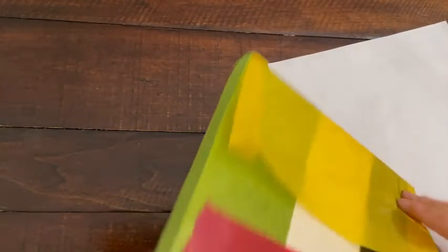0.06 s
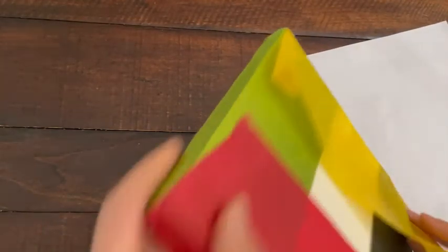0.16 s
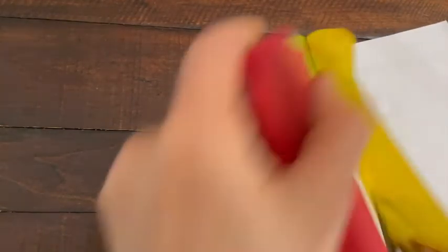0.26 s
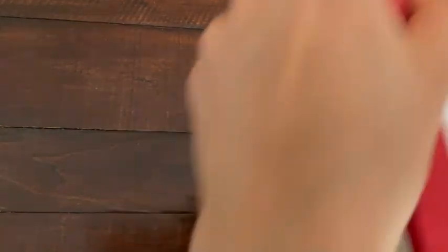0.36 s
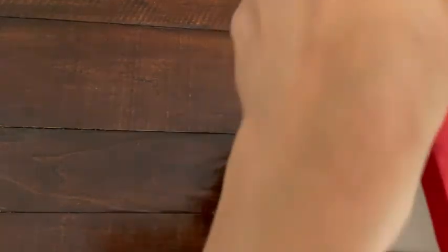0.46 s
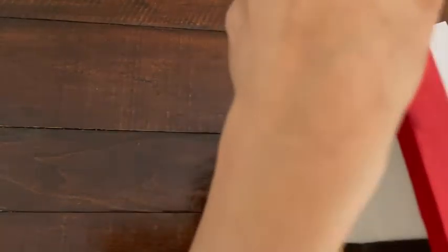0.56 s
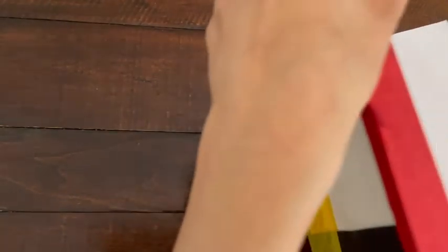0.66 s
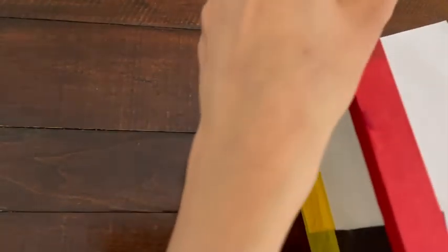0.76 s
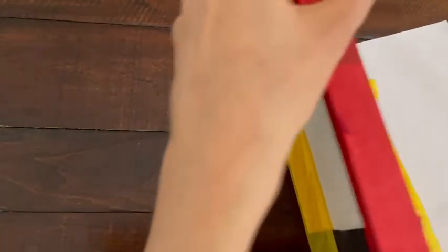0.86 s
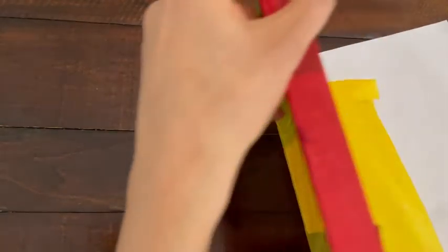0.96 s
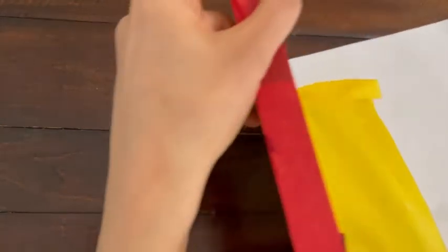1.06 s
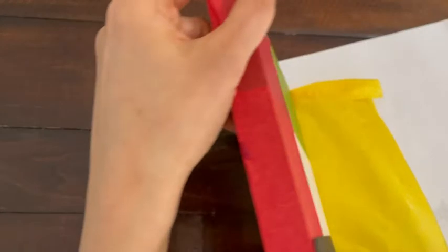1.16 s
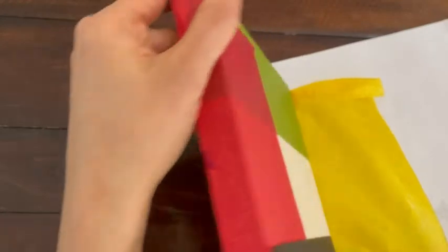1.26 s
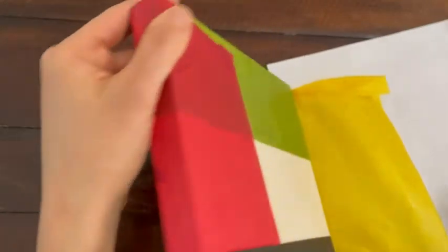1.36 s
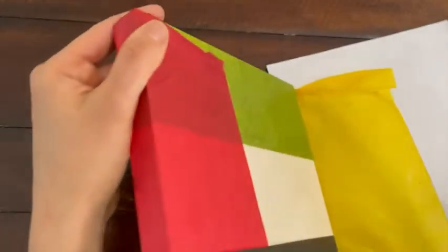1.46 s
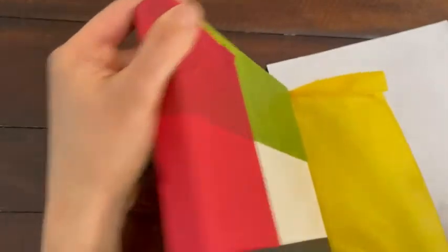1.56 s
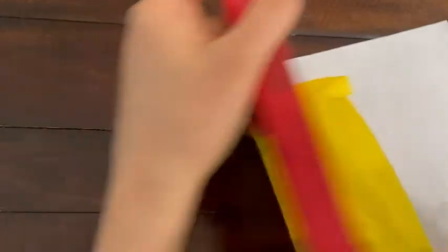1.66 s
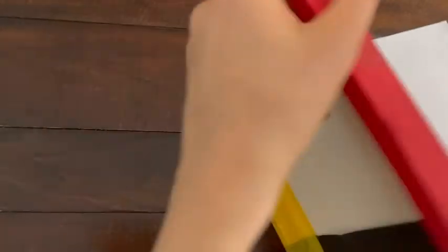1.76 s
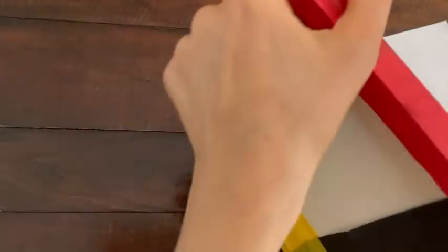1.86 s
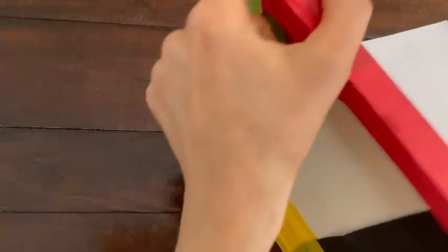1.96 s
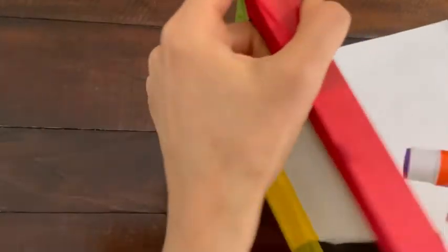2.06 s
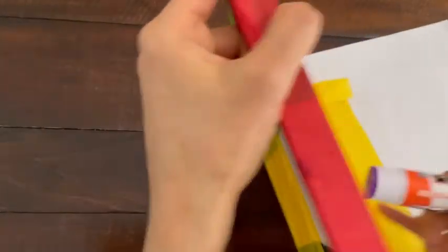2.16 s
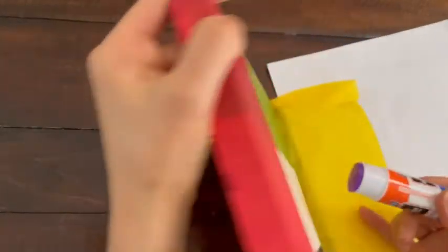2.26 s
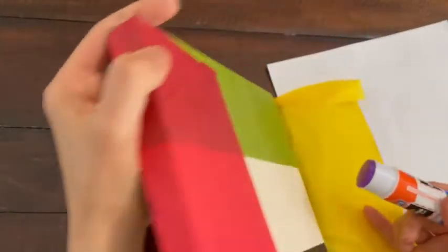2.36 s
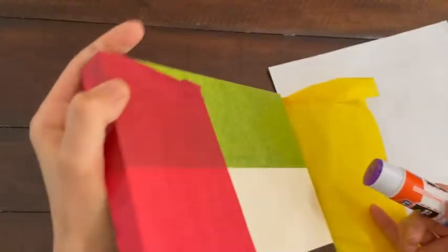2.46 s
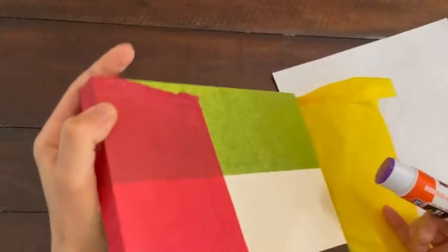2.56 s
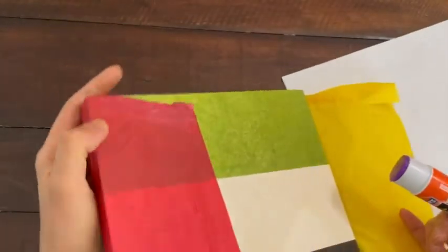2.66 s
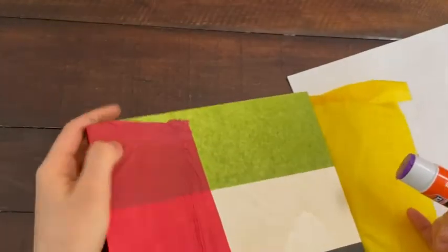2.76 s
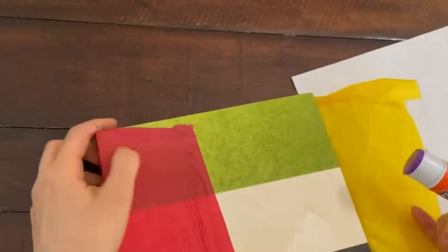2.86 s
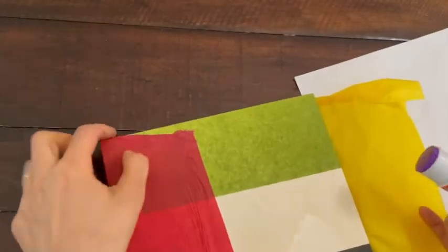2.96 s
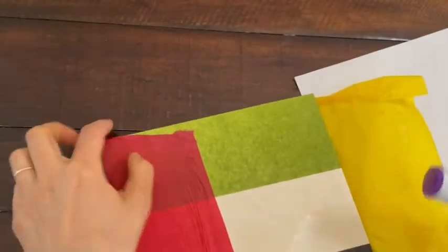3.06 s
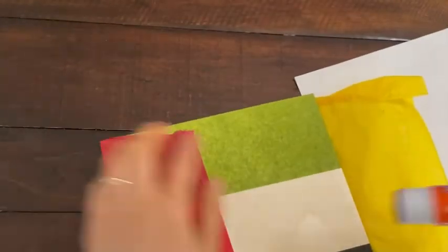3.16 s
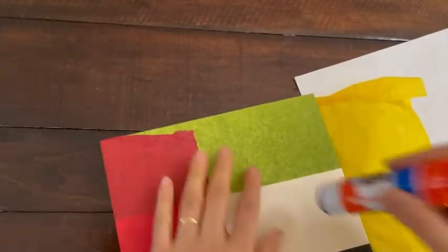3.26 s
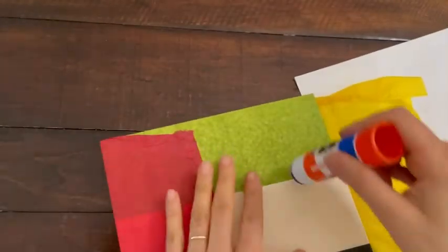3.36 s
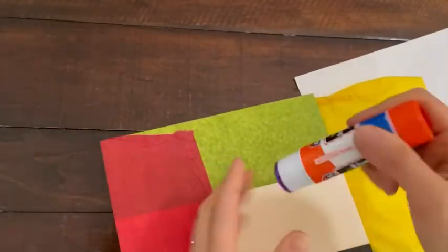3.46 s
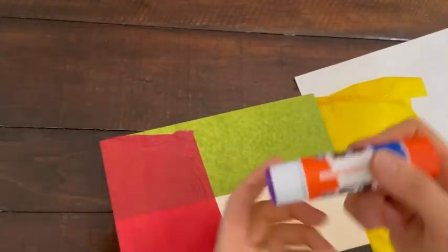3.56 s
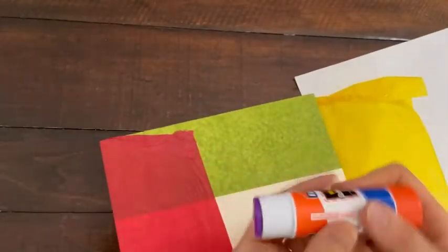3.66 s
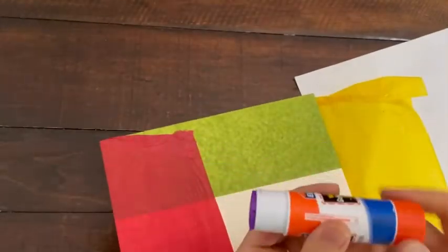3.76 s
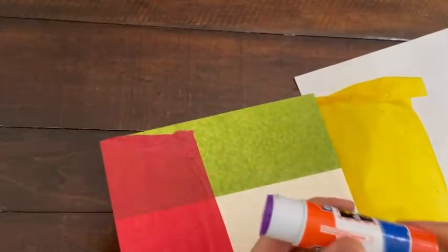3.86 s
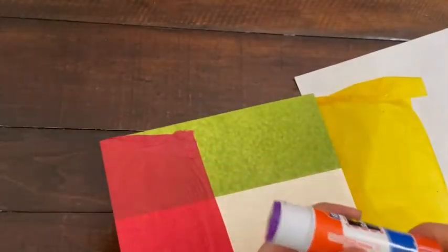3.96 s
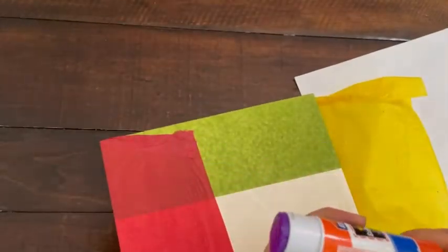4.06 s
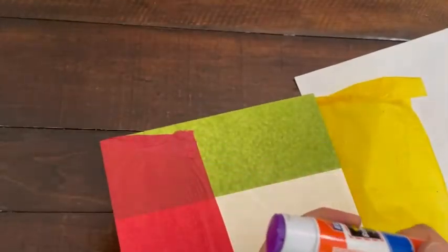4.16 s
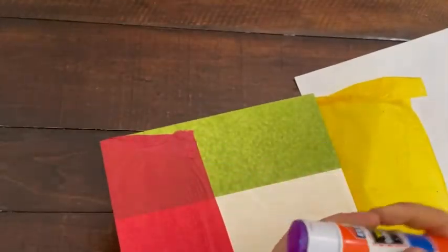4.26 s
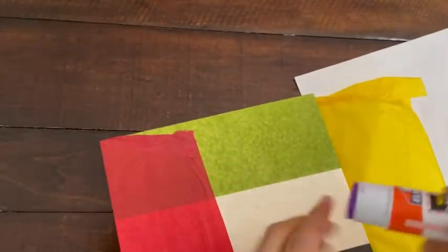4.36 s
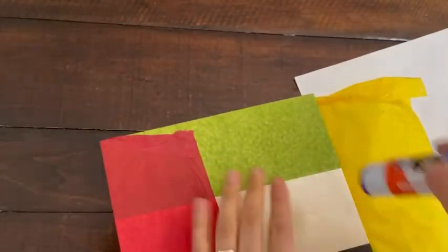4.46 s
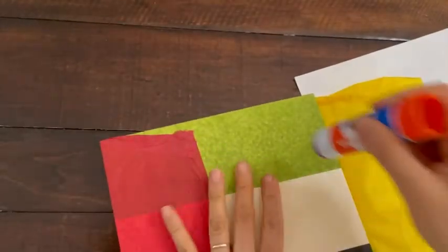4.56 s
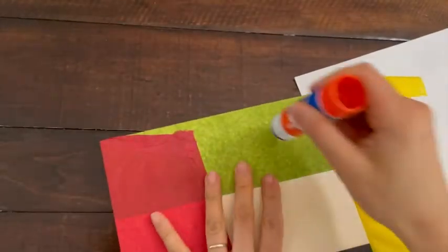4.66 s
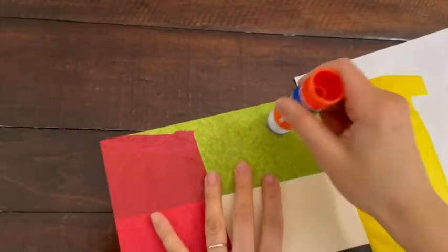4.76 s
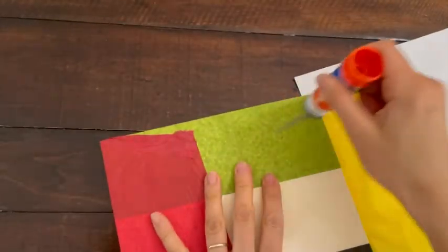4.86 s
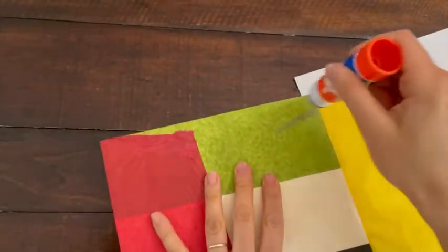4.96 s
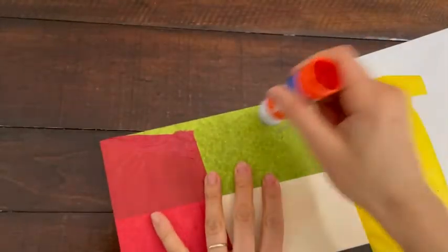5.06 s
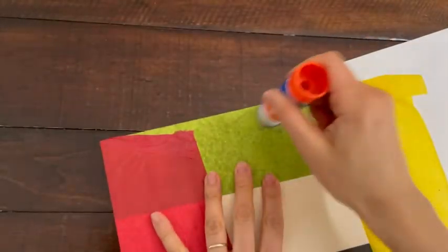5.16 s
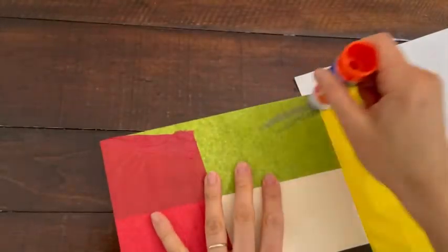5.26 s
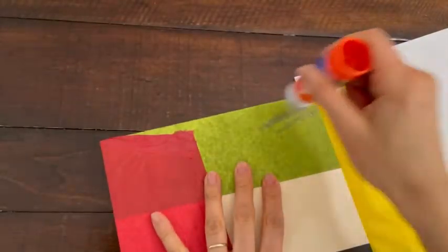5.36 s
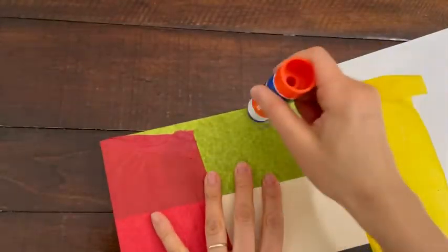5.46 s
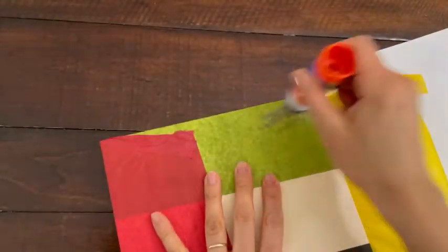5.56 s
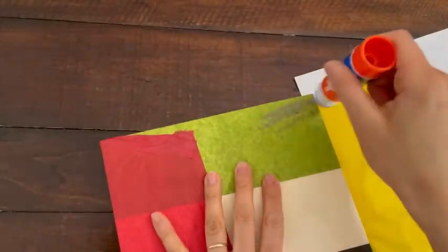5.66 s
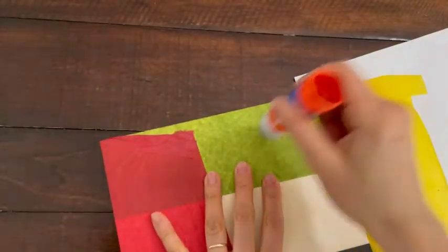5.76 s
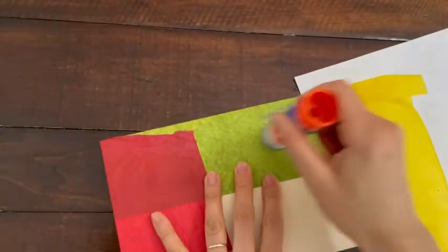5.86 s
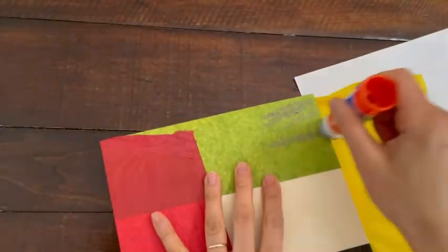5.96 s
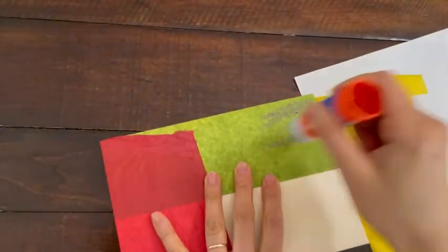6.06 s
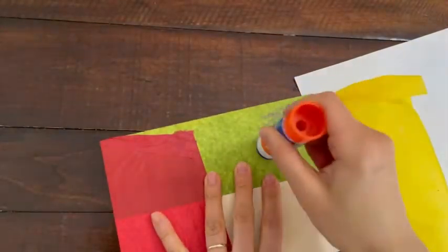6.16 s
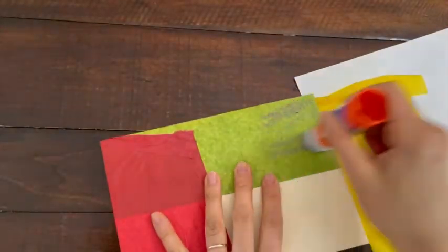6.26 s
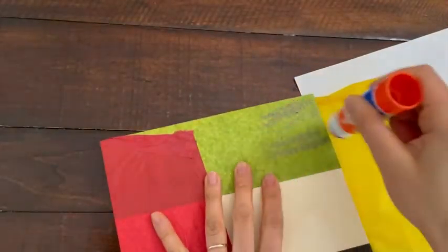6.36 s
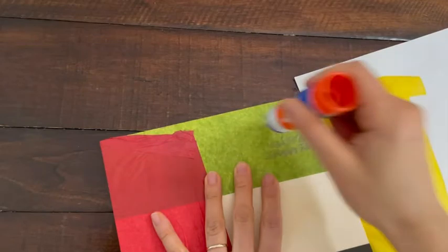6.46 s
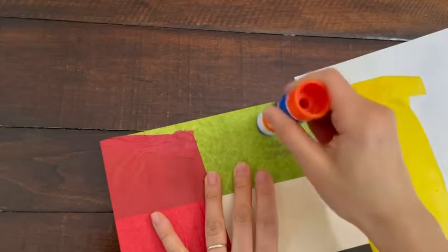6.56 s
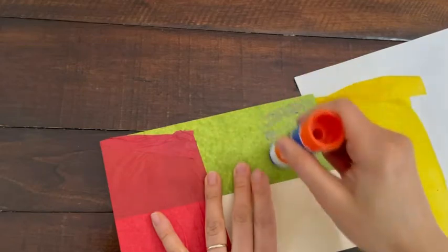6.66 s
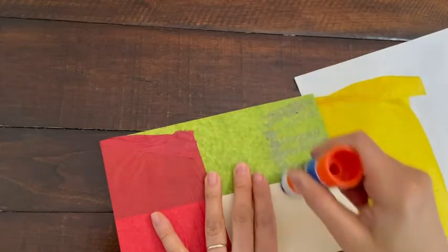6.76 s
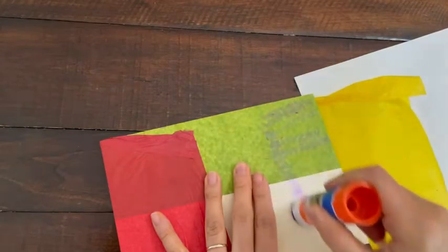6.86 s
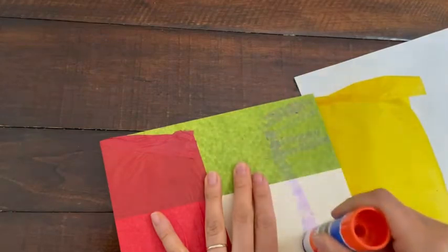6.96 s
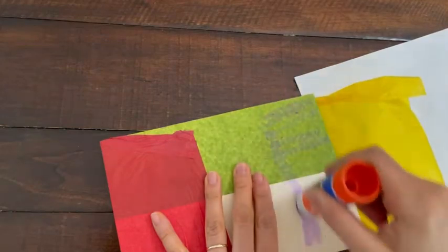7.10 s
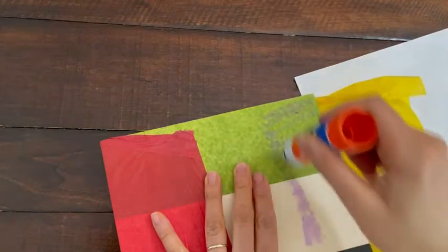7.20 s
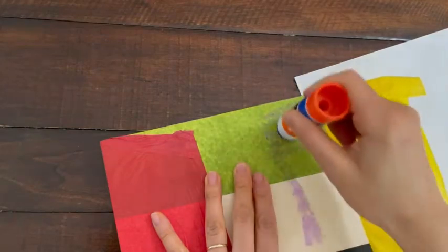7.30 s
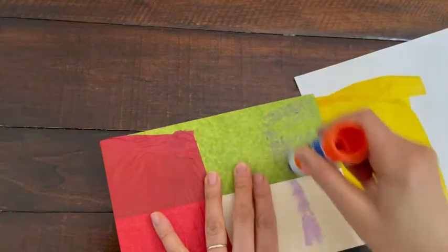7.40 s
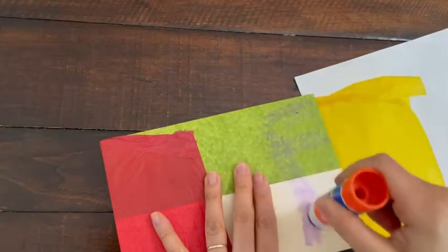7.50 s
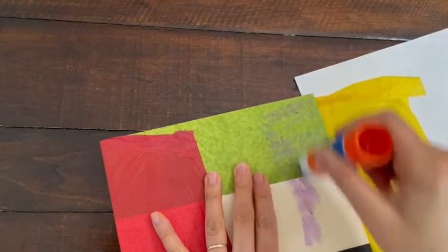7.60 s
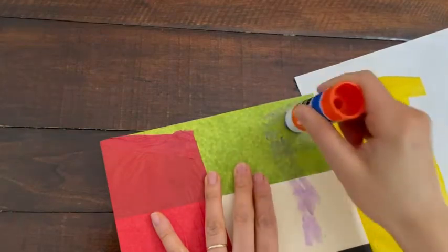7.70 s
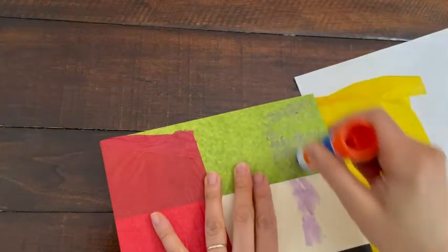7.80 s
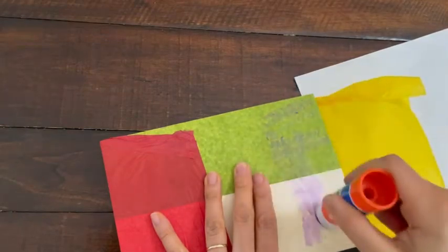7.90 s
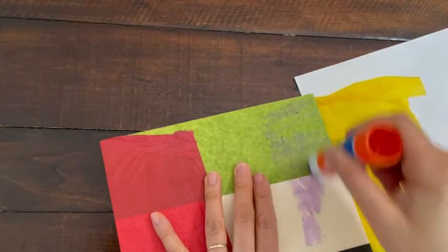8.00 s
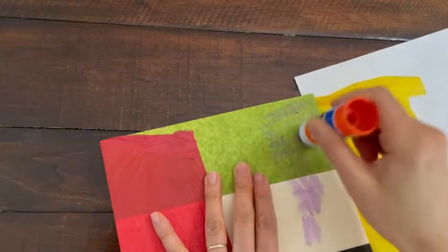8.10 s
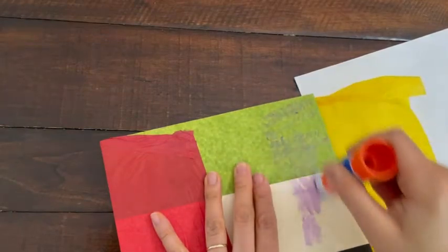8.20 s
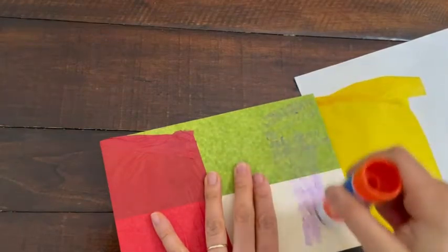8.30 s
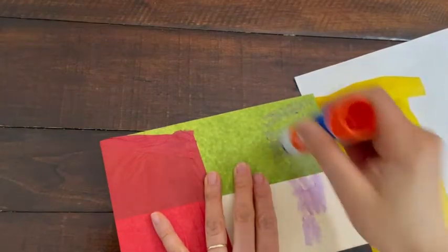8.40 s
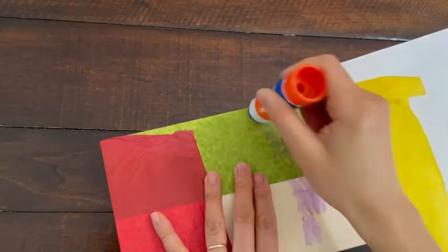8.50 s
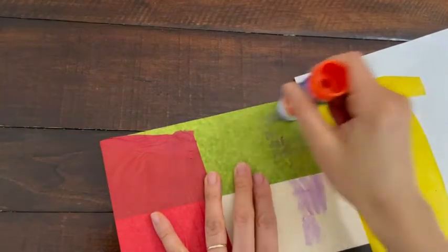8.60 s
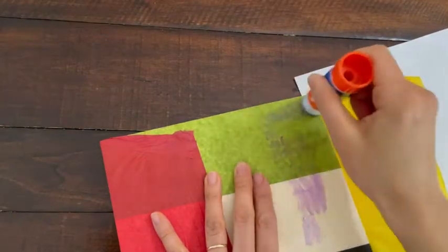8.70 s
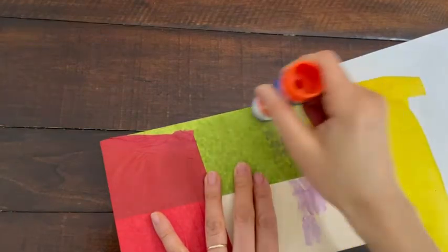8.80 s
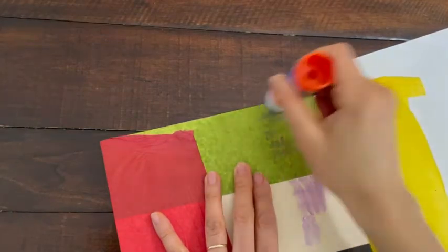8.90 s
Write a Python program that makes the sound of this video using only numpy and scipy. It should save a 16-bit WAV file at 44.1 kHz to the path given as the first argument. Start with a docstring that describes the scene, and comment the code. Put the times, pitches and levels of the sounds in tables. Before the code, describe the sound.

Close to a wooden table in a small quiet room, hands turn a light cardboard box wrapped in tissue paper: short rustles, scrapes, crisp crease snaps and soft taps. It is set down with one loud hollow knock. Faint handling follows, then a glue stick dabs the box in regular strokes, each a small tick and dull hollow thud with a very faint smear.

```python
"""A tissue-covered cardboard box rustles and creaks in the hands: sliding grains of noise over hollow resonances,
with soft finger taps as short damped modes and crease snaps as noise cracks.
Near 2.9 s it is set down on a wooden table with one knock: ringing panels, a dense clack and a table boom.
After lighter handling, a glue stick dabs it from 4.7 s: each stroke ticks, thuds, booms and smears over the tissue.
A small room answers the close contacts, over quiet air and a faint whine; two ports close above the table hear it."""
import sys
import numpy as np
from scipy import signal
from scipy.fft import rfft, irfft, next_fast_len
from scipy.io import wavfile
from scipy.ndimage import uniform_filter1d, minimum_filter1d, map_coordinates

SR = 44100
rng = np.random.default_rng(int(sys.argv[2]) if len(sys.argv) > 2 else 0)


def transcribe(u):
    """Save the signal u as a 16-bit wav file named by the first command-line argument.

    u: samples, shape (n,) or (channels, n), limited to [-1, 1]; the rate is SR.
    q: integer samples, one column per channel.
    """
    v = np.clip(np.atleast_2d(u).T, -1, 1)
    q = np.round(v * 32767).astype(np.int16)
    wavfile.write(sys.argv[1], SR, q)


N = 394254  # samples

# All levels are relative: each layer trims them in its own mix.
# skin or glue sliding over the wrapped box:
# (time [s], length [s], swell from start to end [dB], tissue hiss level [dB], card scrape level [dB])
SLIDES = [(0, .17, -8.5, -57.5, -52.5), (0.176, .22, -10, -63.5, -62), (.4, .07, 3, -57.5, -55),
          (0.491, .13, 5.5, -64, -71.5), (.66, 0.105, 4, -75, -77.5), (0.801, .2, -5, -85.5, -91),
          (1.021, .18, -21, -59.5, -54.5), (1.266, .13, 2, -71, -68), (1.426, .26, 5, -63.5, -65.5),
          (1.69, .055, 4, -58, -58.5), (1.76, .065, -0.5, -64, -66.5), (1.89, 0.1692, -2.5, -62, -66.5),
          (2.063, .14, 4, -63.5, -66), (2.21, .29, 7, -62.5, -60.5), (2.499, .1, 4, -56.5, -49.5),
          (2.621, .18, -5, -64, -62), (2.819, .06, 3.5, -62, -56.5), (3.407, 0.051, 2, -85, -90.5),
          (3.567, .14, -5.5, -75.5, -84), (4.104, .035, 0.5, -59.5, -65), (4.183, .13, -8, -78, -92),
          (4.478, .1, -6, -69, -62.5), (6.233, 0.014, -1, -48, -45), (6.25, 0.13, -16.5, -76, -70.5),
          (6.596, .085, -4, -77, -69.5), (6.72, .18, 5, -87.5, -84.5), (6.926, .1, -2.5, -87.5, -80.5)]
# the box flexing and bumping in the hands: (time [s], hollow body level [dB], table rumble level [dB])
BUMPS = [(0, -45, -49.5), (.085, -40, -44), (.44, -56, -57), (0.614, -61.5, -47), (1.026, -41.5, -56.5),
         (1.09, -53, -64.5), (1.75, -63, -54.5), (1.895, -55, -62), (2.25, -61, -57.5), (2.33, -51.5, -63),
         (2.43, -53, -65.5), (2.59, -51.5, -70), (2.66, -57, -53.5), (2.86, -55, -51)]
# light finger taps on the box: (time [s], level [dB])
FINGER_TAPS = [(0.099, -33), (1.031, -37.5), (1.046, -35.5), (1.895, -48), (4.494, -32.5), (6.237, -36),
               (6.679, -49.5), (7.034, -48)]
# creases of tissue snapping: (time [s], level [dB])
CREASE_SNAPS = [(0.4105, -42.5), (0.6025, -39), (1.0329, -25.5), (1.0472, -22.5), (1.1982, -35.5),
                (1.8243, -45.5), (2.1414, -46.5), (2.159, -36.5), (2.2129, -41.5), (2.3002, -41.5),
                (2.3558, -45.5), (2.5191, -40), (2.6874, -44.5), (4.2046, -49), (6.2369, -31.5)]
# the box set down, one edge first: (time [s], level [dB])
SETTING_DOWN = [(2.888, -25), (2.8943, 1)]
# the glue stick landing: (time [s], tick level [dB], thud level [dB], thud brightness [dB],
# table boom level [dB], smear level [dB], panel tuning [ratio])
GLUE_DABS = [(4.686, -35, -40, 1, -44.5, -81.5, 1.01), (5.0491, -27, -28.5, -2, -37, -77.5, 0.99),
             (5.4043, -34.5, -28, 3.5, -37, -78, 1.03), (5.7593, -15.5, -26, -1, -37, -73, 1.034),
             (6.1035, -21.5, -26.5, 2.5, -38, -71, 0.98), (6.4784, -55.5, -36.5, -2, -41.5, -79, 0.88),
             (7.2473, -47, -41.5, 0, -46, -70.5, 1.016), (7.639, -39, -31.5, -5.5, -40, -70, 1.025),
             (8.0453, -38, -31, -3.5, -39.5, -76, 1.05), (8.4603, -42.5, -32.5, -3.5, -39.5, -84.5, 1.07),
             (8.7622, -39, -35.5, 0.5, -41.5, -80, 1.06)]

# ringing modes of the free box: (frequency [Hz], level [dB], t60 [s])
BOX_MODES = [(160, -18.5, 0.036), (222.7, -11.5, .045), (331.8, -15, 0.027), (421, -8, 0.029),
             (500, -3.5, 0.043), (631.3, -10.5, .035), (820.2, -10.5, .022), (1014, -6.5, 0.07),
             (1188, -7.5, 0.056), (1636, -36, 0.073), (1775, -29.5, 0.074)]
# the box held flat under the hand, before tuning: (frequency [Hz], level [dB], t60 [s])
PRESSED_MODES = [(208, -5.5, 0.057), (273, -4, 0.042), (429.3, 0, 0.036), (517, -1, 0.027),
                 (660, -6.5, .02), (845, -9.5, 0.018)]
# the plastic glue tube on the card, before detuning: (frequency [Hz], level [dB], t60 [s])
TUBE_MODES = [(1093.5, -0.5, 0.021), (1380, -2.5, 0.016), (2040, -3.5, 0.014), (2296, -6, 0.0097),
              (2950, -9, 0.0064)]
# the table top: (frequency [Hz], level [dB], t60 [s])
TABLE_MODES = [(44, -7.5, .7), (64, -11, 1), (79.4, -7.5, 0.52), (109.53, -2.5, 0.55), (128, -2.5, .3),
               (134, -0.5, .4), (184.5, -7, 0.42), (221, -8, 0.4), (281, -3, 0.36)]
# box panels under a sliding hand: (frequency [Hz], width [Hz], level [dB])
PANEL_PEAKS = [(802, 140, -10), (1023.3, 45, -2), (1180, 50, -1), (1298.7, 40, -3), (1562, 84.5, -1),
               (1940, 140, -6), (2265, 65.5, -1), (2600, 73, -2), (2910, 230, -10.5)]
# air in the box under a sliding hand: (frequency [Hz], width [Hz], level [dB])
CAVITY_PEAKS = [(225, 82, -9.5), (256, 22, 2.5), (300, 14, 1), (365.6, 37, 0.5), (420, 70, -6.5),
                (545, 26, -5), (658.2, 50, -12)]

# hiss of the tissue: (frequency [Hz], level per Hz [dB])
TISSUE_SPECTRUM = [(500, -40), (1500, -12), (2800, -1.5), (3800, -1), (4900, -4.5), (5400, -0.5),
                   (6200, -3), (7400, -2.5), (8500, -0.5), (10500, -10), (14000, -0.5), (16000, -7)]
# rubbing on card: (frequency [Hz], level per Hz [dB])
CARD_SPECTRUM = [(300, -19.5), (700, 2.5), (1300, 0), (2500, -0.5), (3200, -4.5), (5000, -25)]
# rubbing heard inside the hollow box: (frequency [Hz], level per Hz [dB])
HOLLOW_SPECTRUM = [(100, -20), (200, -4), (300, -2.5), (550, -2), (800, -2), (1500, -25)]
# low table rumble: (frequency [Hz], level per Hz [dB])
RUMBLE_SPECTRUM = [(20, -30.5), (45, -3), (65, -1), (110, 2), (170, -6.5), (300, -19.5), (700, -56)]
# glue smearing over tissue: (frequency [Hz], level per Hz [dB])
SMEAR_SPECTRUM = [(100, -23.5), (300, -6), (700, 3), (1500, 7), (2500, 4.5), (3600, 2.5), (4500, -4.5),
                  (6000, 2), (9000, -3), (14000, 0.5), (16000, -13)]
# crack of a crease: (frequency [Hz], level per Hz [dB])
CREASE_SPECTRUM = [(300, -19), (1200, -4.5), (2300, -4), (4000, -1.5), (6000, 1.5), (8500, 2), (11000, -6),
                   (14000, -6), (16000, -10)]
# air of the quiet room: (frequency [Hz], level per Hz [dB])
QUIET_SPECTRUM = [(20, -14), (32, -9), (45, 3), (60, 5.5), (85, -4.5), (120, -1.5), (180, -7.5), (400, -16),
                  (800, -26), (2000, -36.5), (5000, -38.5), (10000, -41), (15000, -38)]
# crowded, heavily damped resonances of the card: (frequency [Hz], level per Hz [dB])
CLACK_SPECTRUM = [(25, -40.5), (100, -11.5), (320, 9), (750, 7.5), (1200, 2), (1500, -5), (2300, -7),
                  (3600, -21.5), (5000, -34), (8000, -38.5), (15000, -41)]
# dense part of the glue stick's tick: (frequency [Hz], level per Hz [dB])
TICK_SPECTRUM = [(100, -23), (300, -6), (900, 5.5), (1600, 5), (2400, 1), (3100, 0), (4000, -11),
                 (6000, -18), (9000, -18.5), (15000, -24.5)]

# room decay: (frequency [Hz], t60 [s])
ROOM_T60 = [(100, 0.44), (500, 0.46), (1100, 0.51), (2000, .48), (3200, 0.3845), (8000, 0.2052),
            (15000, 0.28)]
# tone of the room's answer: (frequency [Hz], level [dB])
ROOM_COLOUR = [(50, -14), (130, -1), (250, 2), (430, -.5), (560, 0), (800, -1.5), (1100, -3.5), (1900, -5),
               (3000, -2), (6000, 3), (15000, -3)]
# diffuse sound: (frequency [Hz], left-right likeness [0 to 1])
ROOM_ALIKE = [(60, 1), (290, .9), (640, 0.36), (1400, .4), (4000, 0.2), (9000, 0.85), (11500, 0.87),
              (15000, .6)]
# close sound: (frequency [Hz], left-right likeness [0 to 1])
NEAR_ALIKE = [(60, 1), (300, .85), (650, 0.44), (1400, .93), (3000, 0.6), (6000, 0.42), (8500, 0.76),
              (10000, 1), (11300, 0.93), (15000, 0.34)]
# phase between the two ports: (frequency [Hz], left lead [radians])
PORT_PHASE = [(100, 0), (400, -.1), (860, -.25), (1400, -.05), (2200, .05), (4300, .55), (5500, 0),
              (6500, .9), (7400, 1.8), (8600, 2.9), (11200, 3.3), (12500, 4.4), (14200, 6)]
# knock balance, positive to the left: (frequency [Hz], left minus right [dB])
KNOCK_LEAN = [(100, -0.5), (300, 2.0), (700, 1.0), (1200, -4.5), (4000, -1.5), (9000, -0.5)]

TOP_HZ = 15900  # band limit
SLIDE_ATTACK_SHARE, SLIDE_RELEASE_T60 = .1, 0.075  # rise time constant / slide length; its stop (s)
BODY_FOLLOWS_DB, TABLE_FOLLOWS_DB = -6.5, -13.5  # how much of the scrape reaches the hollow box and the table
BODY_ATTACK_S, BODY_T60, RUMBLE_ATTACK_S, RUMBLE_T60 = .008, 0.39, 0.031, .7  # rise and decay after a bump (s)


def amp(db):
    """Decibels to a linear gain."""
    return 10 ** (np.asarray(db) / 20)


def unit(x):
    """Scale a sound to rms 1."""
    return x / np.sqrt(np.mean(x ** 2) + 1e-20)


def along(points, hz):
    """Read a (frequency, value) curve on a log frequency axis."""
    f, v = np.transpose(points)
    return np.interp(np.log(hz + 1), np.log(f + 1), v)


def wobble(rate):
    """A smooth random curve, rate knots a second."""
    knots = rng.standard_normal(int(N * rate / SR) + 4)
    return map_coordinates(knots, [np.arange(N) * rate / SR])


def filtered(x, response):
    """Shape a sound by a response of frequency."""
    size = x.shape[-1]
    padded = next_fast_len(size + 8192)
    spectrum = rfft(x, padded) * response(np.fft.rfftfreq(padded, 1 / SR))
    return irfft(spectrum, padded)[..., :size]


def stereo(pair, spectrum, alike):
    """Two unrelated signals, coloured and blended into left and right."""
    def mid_side(hz):
        turn = np.arccos(np.clip(along(alike, hz), -1, 1)) / 2
        return amp(along(spectrum, hz)) * [np.cos(turn), np.sin(turn)]

    mid, side = filtered(pair, mid_side)
    return np.array([mid + side, mid - side])


def add(track, s, sound):
    """Mix a sound in at time s."""
    part = track[..., round(s * SR):][..., :sound.shape[-1]]
    part += sound[..., :part.shape[-1]]


def panned(x, left_db):
    """Lean a sound to the left."""
    return x * amp([[left_db / 2], [-left_db / 2]])


def room(x, wet_db, left_db=0, build=0.004):
    """A sound plus the room's answer, each frequency dying at its own speed."""
    hz, t, z = signal.stft(rng.standard_normal((2, SR * 3 // 4)), SR, nperseg=256)
    decay = amp(-60 * t / along(ROOM_T60, hz)[:, None])
    tail = signal.istft(z * decay * (1 - np.exp(-t / build)), SR, nperseg=256)[1]
    tail = stereo(tail / np.linalg.norm(tail[0]), ROOM_COLOUR, ROOM_ALIKE)
    # both channels together excite the room
    answer = signal.fftconvolve(x[:1] + x[1:], tail / 2, axes=1)[:, :x.shape[-1]]
    return x + amp(wet_db) * panned(answer, left_db)


def ring(modes, attack, scatter_db, tuning=1, detune=0):
    """One blow on a body: decaying modes with random level and pitch, neighbours swinging in opposite senses."""
    t = np.arange(SR) / SR
    chance = rng.standard_normal((len(modes), 2))
    total = np.zeros(SR)
    for k, ((hz, db, t60), (size, shift)) in enumerate(zip(modes, chance)):
        pitch = hz * tuning * (1 + detune * shift)
        level = amp(db + scatter_db * size - 60 * t / t60)
        total += (-1) ** k * level * np.sin(2 * np.pi * pitch * t)
    return total * (1 - np.exp(-t / attack))


def clack(spectrum, t60):
    """Many close resonances struck at once and dying together."""
    t = np.arange(SR) / SR
    dense = unit(filtered(rng.standard_normal(SR), lambda hz: amp(along(spectrum, hz))))
    return dense * amp(-60 * t / t60) * (1 - np.exp(-t / 0.00021))


def resonate(x, peaks):
    """Pass a sound through a body's resonances and scale it to rms 1."""
    def body(f):
        total = 0
        for k, (hz, width, db) in enumerate(peaks):
            total = total + (-1) ** k * amp(db) * 1j * f * width / (hz * hz - f * f + 1j * f * width)
        return total

    return unit(filtered(x, body))


def patchy(pair, depth_db):
    """The colour shifts as the contact wanders over the sheet."""
    z = signal.stft(pair, nperseg=512)[2]
    field = uniform_filter1d(rng.standard_normal(z.shape[1:]), size=5, axis=0)  # across frequency
    field = uniform_filter1d(field, size=16, axis=1)  # across time
    return signal.istft(z * amp(depth_db * unit(field)), nperseg=512)[1][:, :N]


def friction(spectrum, rate, grain_db, rough_db, patchy_db):
    """Fibres catching and letting go: tiny slips (rate per second) of uneven size over a smooth hiss, rms 1."""
    slips = (rng.random(N) < rate / SR) * rng.standard_normal((2, N))
    pair = rng.standard_normal((2, N)) + amp(grain_db) * unit(slips)
    rough = pair * amp(rough_db * wobble(70))
    return unit(stereo(patchy(rough, patchy_db), spectrum, NEAR_ALIKE))


def background():
    """A quiet room: low hum of air and a faint, wavering whine."""
    air = amp(-67.5) * unit(stereo(rng.standard_normal((2, N)), QUIET_SPECTRUM, ROOM_ALIKE))
    whine_hz = 2990 + 25 * wobble(40)
    whine = amp(-101 + 3 * wobble(2.9)) * np.sin(2 * np.pi * np.cumsum(whine_hz) / SR)
    return air + whine


def slide_gains():
    """Hiss and scrape gains: each slide gets up to speed, swells or eases off, and stops."""
    t, pair = np.arange(SR) / SR, np.zeros((2, N))
    for s, length, swell_db, hiss_db, scrape_db in SLIDES:
        attack = 1 - np.exp(-t / (SLIDE_ATTACK_SHARE * length))
        hold = amp(swell_db * (np.minimum(t / length, 1) - .5))
        release = amp(-60 * np.maximum(t - length, 0) / SLIDE_RELEASE_T60)
        add(pair, s, amp([[hiss_db], [scrape_db]]) * attack * hold * release)
    return pair


def bump_gains():
    """Body and rumble gains: the box answers a bump quickly, the heavy table more slowly."""
    t, pair = np.arange(SR) / SR, np.zeros((2, N))
    body_swell = (1 - np.exp(-t / BODY_ATTACK_S)) * amp(-60 * t / BODY_T60)
    rumble_swell = (1 - np.exp(-t / RUMBLE_ATTACK_S)) * amp(-60 * t / RUMBLE_T60)
    for s, body_db, rumble_db in BUMPS:
        add(pair, s, np.array([amp(body_db) * body_swell, amp(rumble_db) * rumble_swell]))
    return pair


def handling():
    """Skin slides on tissue and card; the hollow box and the table murmur under it."""
    hiss, scrape = slide_gains()
    followed = amp([[BODY_FOLLOWS_DB], [TABLE_FOLLOWS_DB]]) * scrape
    body, rumble = np.hypot(bump_gains(), followed)  # bumps and scrape add in power
    tissue_rub = friction(TISSUE_SPECTRUM, rate=200, grain_db=-5, rough_db=2, patchy_db=1.0)
    card_rub = friction(CARD_SPECTRUM, rate=300, grain_db=-2.0, rough_db=2.5, patchy_db=5)
    hollow_rub = friction(HOLLOW_SPECTRUM, rate=73, grain_db=-4.5, rough_db=1.0, patchy_db=3.0)
    tissue = amp(3.5) * hiss * tissue_rub
    card = scrape * resonate(card_rub, PANEL_PEAKS)
    box = amp(-0.5) * body * resonate(hollow_rub, CAVITY_PEAKS)
    table = amp(0.5) * rumble * unit(stereo(rng.standard_normal((2, N)), RUMBLE_SPECTRUM, ROOM_ALIKE))
    return room(tissue + card, wet_db=-9) + box + table


def taps():
    """Fingertips land softly on the held box, ringing its damped modes over a short clack."""
    track = np.zeros(N)
    for s, db in FINGER_TAPS:
        thud = ring(PRESSED_MODES, attack=0.0051, scatter_db=0.5, tuning=1.195, detune=0.018)
        add(track, s, amp(db - 5.5) * (thud + amp(-6.0) * clack(CLACK_SPECTRUM, t60=0.04)))
    return room(panned(track, left_db=1.0), wet_db=-8.5)


def burst(t60):
    """A crack of noise dying away."""
    return amp(-60 * np.arange(SR) / SR / t60) * rng.standard_normal(SR)


def snaps():
    """A crease buckles with a short crack, and the sheet around it shivers."""
    pair = np.zeros((2, N))
    for s, db in CREASE_SNAPS:
        cracks = np.array([burst(t60=0.011) + amp(-27) * burst(t60=.06) for channel in pair])
        add(pair, s, amp(db - 3.0) * cracks)
    return room(stereo(pair, CREASE_SPECTRUM, NEAR_ALIKE), wet_db=-14)


def knock():
    """The box drops on the table: a dense clack, its panels ring freely, the table booms and the tissue shivers."""
    track = np.zeros(N)
    for s, db in SETTING_DOWN:
        panels = ring(BOX_MODES, attack=.0022, scatter_db=3.0)
        add(track, s, amp(db + 2.5) * (panels + amp(-14.0) * clack(CLACK_SPECTRUM, t60=.055)))
        add(track, s, amp(db - 40) * ring(TABLE_MODES, attack=.003, scatter_db=1.5))
        add(track, s, amp(db - 57.0) * clack(TISSUE_SPECTRUM, t60=.35))
    # the low mids lean left, the upper mids right
    direct = filtered(track, lambda hz: amp(along(KNOCK_LEAN, hz) * [[.5], [-.5]]))
    return room(direct, wet_db=-12, left_db=2.5)


def glue_stick():
    """Each stroke: the glue touches, the tube ticks, the box thuds, the table booms, and the glue smears along."""
    blows, boom, stroke = np.zeros((2, N)), np.zeros(N), np.zeros(N)
    t = np.arange(SR) / SR
    speed = np.interp(t, [0, .05, .13, .21], [0, 1, 1, 0])
    for s, tick_db, thud_db, bright_db, boom_db, smear_db, tuning in GLUE_DABS:
        tube = ring(TUBE_MODES, attack=0.00057, scatter_db=-3.0, detune=0.018)
        tick = amp(tick_db - 4) * (tube + amp(-2) * clack(TICK_SPECTRUM, t60=0.018))
        # a firmer landing reaches the upper modes
        lift_db = bright_db + 4.5
        modes = [(hz, db + lift_db * np.interp(hz, [300, 600], [0, 1]), t60) for hz, db, t60 in PRESSED_MODES]
        contact = 0.002 * amp(.5 * (thud_db - tick_db))  # a cushioned landing pushes for longer
        thud = amp(thud_db + 7.0) * ring(modes, attack=contact, scatter_db=3.0, tuning=tuning, detune=0.04)
        add(blows, s - .0065, amp(-26.5) * (tick + thud))  # the soft glue meets the paper first
        # each landing gets its own freshly drawn room tail
        landing = panned(tick, left_db=0.8) + panned(thud, left_db=2.0)
        add(blows, s, room(landing, wet_db=-9.5, left_db=2))
        add(boom, s, amp(boom_db) * ring(TABLE_MODES, attack=0.01, scatter_db=2.0, detune=0.011))
        add(stroke, s, amp(smear_db) * speed)
    rub = friction(SMEAR_SPECTRUM, rate=180, grain_db=-5.5, rough_db=3.0, patchy_db=2)
    smear = amp(-0.5) * stroke * rub
    return blows + panned(boom, left_db=1.5) + smear


def scene():
    """Mix the room, the handled box, the knock and the glue strokes."""
    box_in_hands = handling() + taps() + amp(2.5) * snaps()
    return background() + box_in_hands + amp(0.18) * knock() + glue_stick()


def record(dry):
    """The ports drift out of phase in the treble; a fast limiter holds the peaks; a band limit cuts the top."""
    ports = filtered(dry, lambda hz: np.exp(.5j * along(PORT_PHASE, hz) * [[1], [-1]]))
    needed = 1 / np.maximum(1, np.abs(ports).max(axis=0) / .91)
    gain = uniform_filter1d(minimum_filter1d(needed, size=110), size=100)  # sizes in samples
    return filtered(ports * gain, lambda hz: hz < TOP_HZ)


dry = scene()
out = record(dry)
transcribe(out)
```